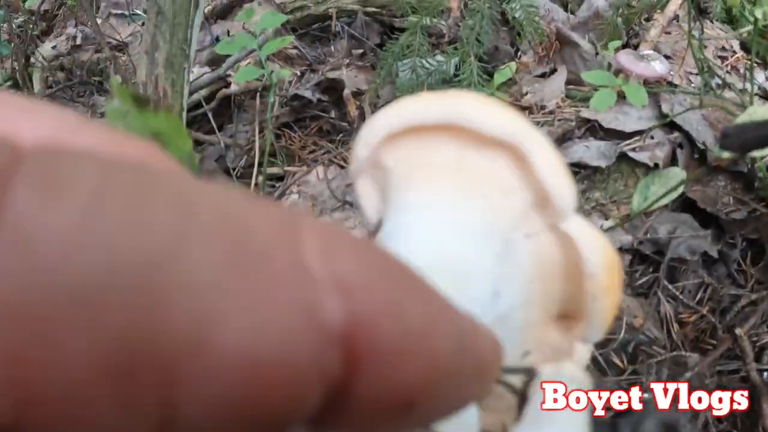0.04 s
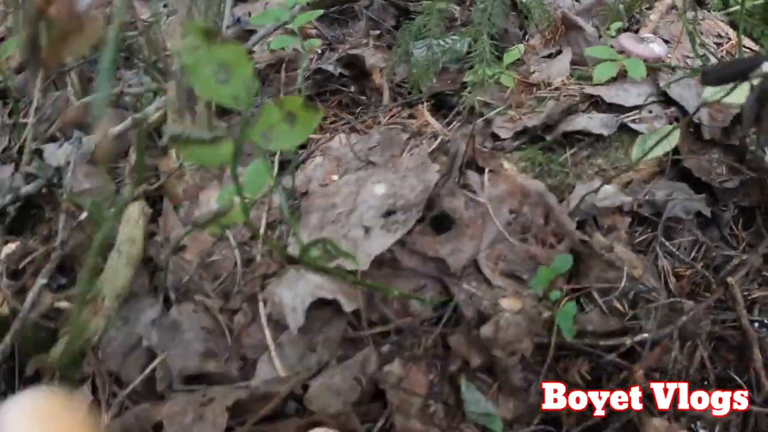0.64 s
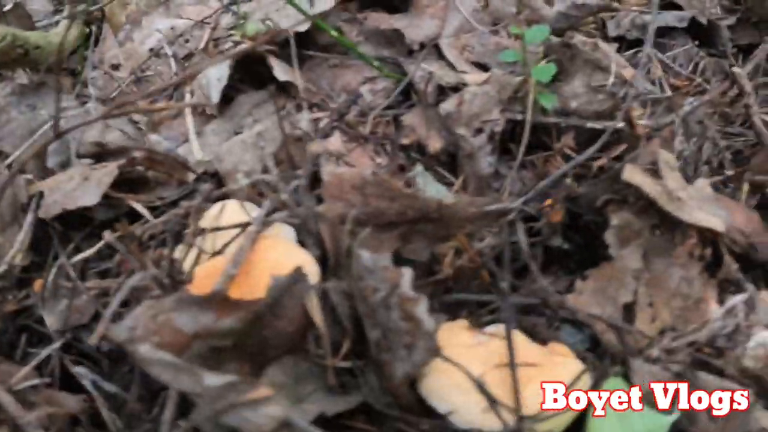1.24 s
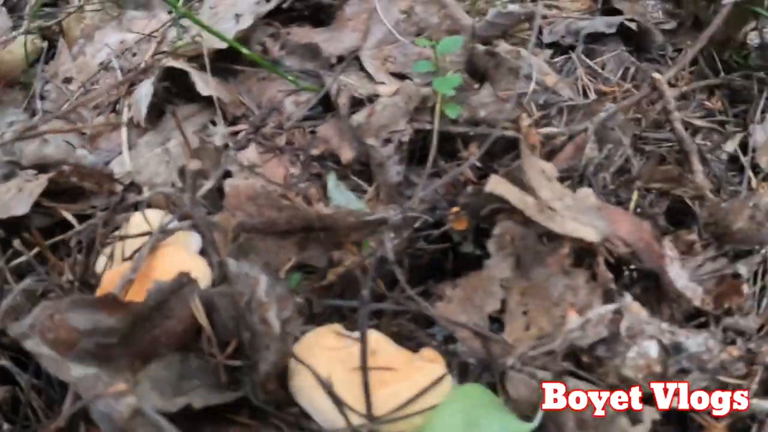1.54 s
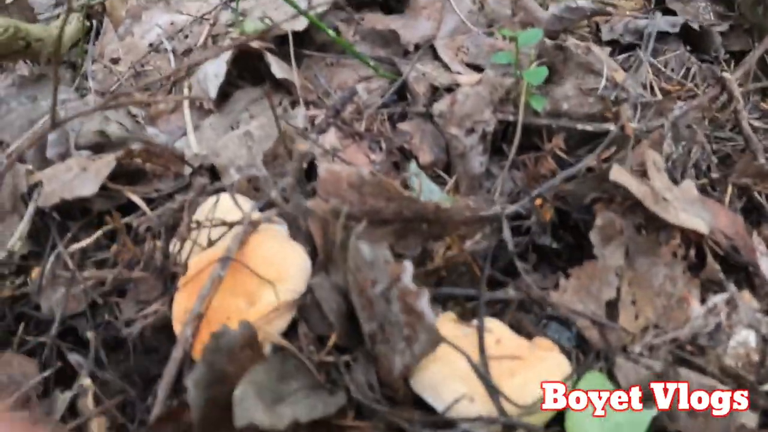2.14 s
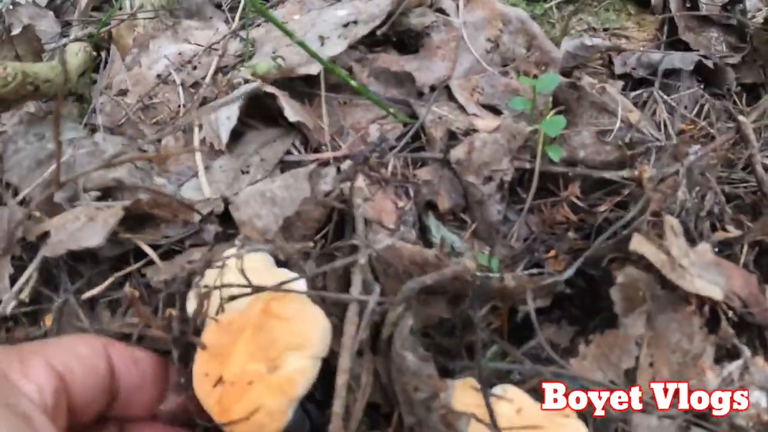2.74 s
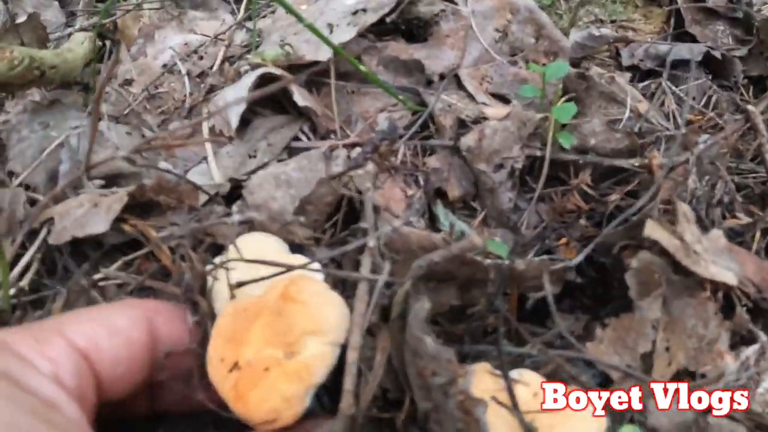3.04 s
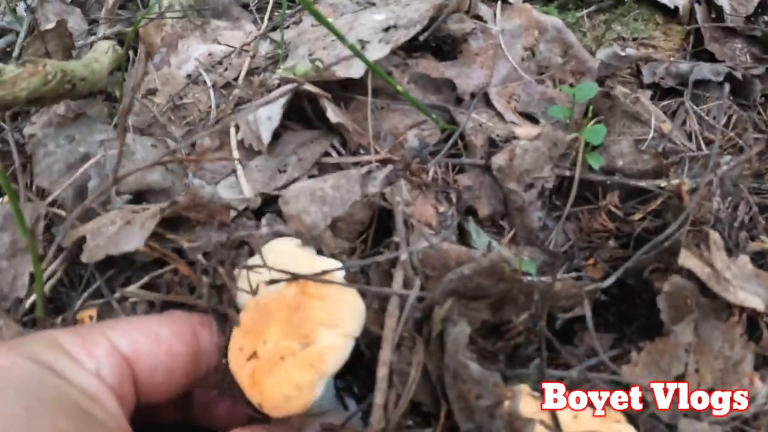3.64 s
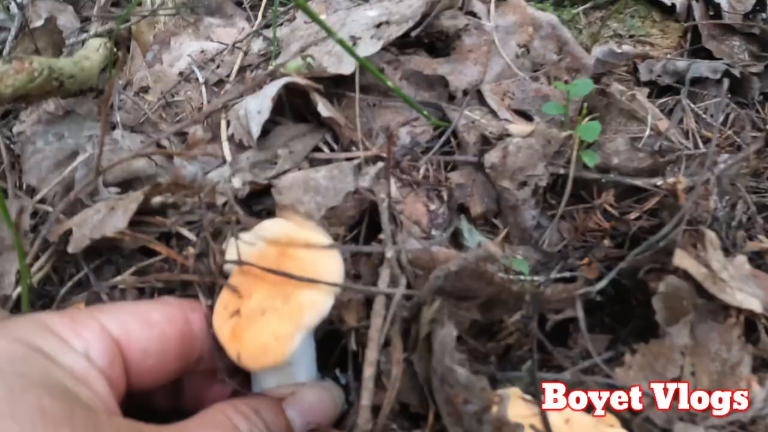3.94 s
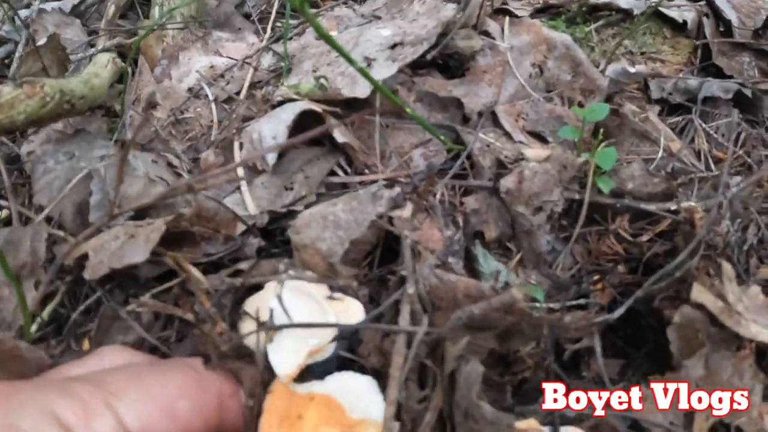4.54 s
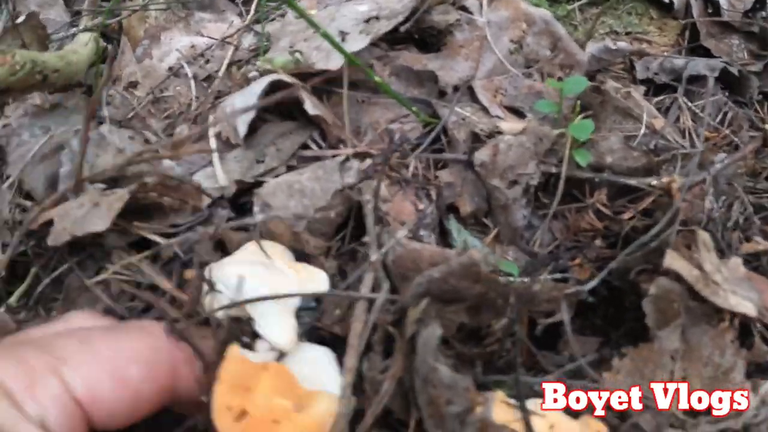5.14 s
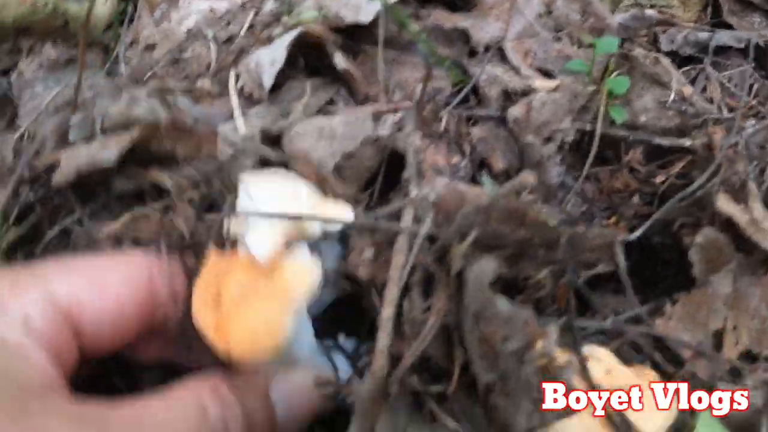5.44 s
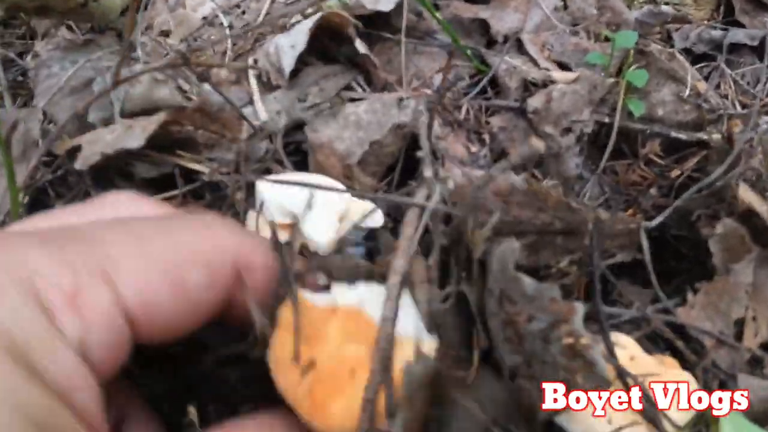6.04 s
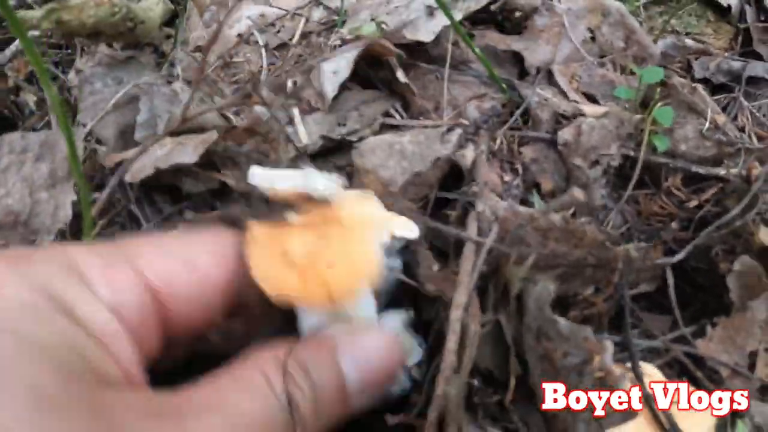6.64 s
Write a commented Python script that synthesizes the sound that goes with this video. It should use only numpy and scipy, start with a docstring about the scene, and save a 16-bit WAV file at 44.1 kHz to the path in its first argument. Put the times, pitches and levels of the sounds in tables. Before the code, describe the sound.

In a quiet forest, crumbs tick faintly between fingertips close to a hand-held microphone. A hand then pushes into dry leaf litter, rustling and scraping, and a wet stalk gives a tiny squeak. The digging grows louder with soft thuds, snapping twigs and hollow pops of parting stems, then eases. Near the end a muffled pop comes with the hardest knock, and the leaves rustle on.

```python
"""A hand digs a mushroom out of dry leaf litter, close to a hand-held camera in a quiet forest.
At first crumbs tick between the fingertips over the forest's hiss and the rumble of the moving camera.
Then the hand pushes in: leaves rub, scrape and fracture, soft impacts thud, and a wet stalk squeaks.
The digging grows louder, twigs and leaf veins snap, and parting stems ring a hollow in the soil.
Near the end a muffled pop comes with the hardest knock, and the leaves rustle on."""
import sys
import numpy as np
from scipy import signal
from scipy.fft import rfft, irfft, next_fast_len
from scipy.io import wavfile
from scipy.ndimage import map_coordinates

SR = 44100
rng = np.random.default_rng(int(sys.argv[2]) if len(sys.argv) > 2 else 0)


def master_out(mix):
    """Clip the mix to full scale and print it as 16-bit PCM to the path in sys.argv[1]."""
    frames = np.transpose(np.atleast_2d(mix))
    ceiling = np.clip(frames, -1, 1)
    pcm = np.round(ceiling * 32767).astype(np.int16)
    wavfile.write(sys.argv[1], SR, pcm)


N = 299439


def amp(db):
    """Decibels to amplitude gain."""
    return 10 ** (np.asarray(db) / 20)


def unit(x):
    """Scale to rms 1."""
    return x / np.sqrt(np.mean(x ** 2) + 1e-20)


def curves(rows):
    """Linear interpolation: one value per sample for each column after the time."""
    times, *columns = np.transpose(rows)
    return [np.interp(np.arange(N) / SR, times, column) for column in columns]


def wobble(rate):
    """Random modulation: a smooth curve through rate Gaussian knots a second."""
    knots = rng.standard_normal(int(N * rate / SR) + 4)
    return map_coordinates(knots, [np.arange(N) * rate / SR])


def filtered(x, response):
    """Linear filtering: the spectrum of x times a frequency response."""
    n = x.shape[-1]
    padded = next_fast_len(n + 2048)
    return irfft(rfft(x, padded) * response(np.fft.rfftfreq(padded, 1 / SR)), padded)[..., :n]


def coloured(x, points):
    """Spectral shaping by (Hz, dB) points on a logarithmic frequency axis."""
    point_hz, db = np.transpose(points)
    return filtered(x, lambda hz: amp(np.interp(np.log(hz + 1), np.log(point_hz), db)))


def ring(x, hz, q):
    """Forced response of one damped resonator."""
    return signal.lfilter(*signal.iirpeak(min(hz, .45 * SR), max(q, 1), SR), x)


def panned(lean_db):
    """Constant-power panning: left and right gains; the lean is left minus right in dB."""
    gains = amp(np.array([lean_db, -lean_db]) / 2)
    return gains / np.sqrt(np.mean(gains ** 2, axis=0))


def add(track, start, sound, lean_db):
    """Superposition: mix a sound into a stereo track from start seconds on."""
    part = track[:, round(start * SR):][:, :sound.shape[-1]]
    part += (panned(lean_db)[:, None] * sound)[:, :part.shape[1]]


def burst(x, db):
    """Give a transient the energy of 4 ms of steady sound at that level."""
    energy = np.mean(np.sum(x ** 2, axis=-1))
    return x * amp(db) * np.sqrt(.004 * SR / energy)


def stereo_noise(side_gain):
    """Partly coherent white noise: a common middle plus and minus an independent side."""
    mid, side = rng.standard_normal((2, N))
    return unit(np.array([mid + side_gain * side, mid - side_gain * side]))


def crackle(rate, spread_db, q, scatter_db, modes=14, breaks=1):
    """Impulse excitation: rate fractures a second, each a cluster of breaks, ring leaf fragments."""
    out = np.zeros((2, N))
    count = int(rate * N / SR / modes)
    for hz in np.geomspace(700, 16000, modes):
        onsets = rng.integers(0, N, (count, 1))
        at = (onsets + rng.integers(0, 70, (count, breaks))).ravel() % N
        strength = amp(spread_db * np.minimum(rng.exponential(size=(count, 1)), 3))
        signs = rng.choice([-1, 1], (count, breaks))
        sides = panned(scatter_db * rng.standard_normal((count, 1)))
        impulses = np.array([np.bincount(at, (strength * signs * side).ravel(), N) for side in sides])
        out += ring(impulses, hz, q)
    return unit(out)


def forest():
    """Ambient noise: a soft broadband hiss whose level drifts slowly."""
    # Each row: frequency in Hz, relative spectral level in dB.
    spectrum = [(20, -25), (100, 0.5), (180, 6), (320, -8), (550, -14.5), (820, -16), (1020, -6.5),
                (1380, -2), (4100, -12.5), (6770, -11.5), (8220, -20), (11800, -29), (13500, -31),
                (15600, -52)]
    hiss = unit(coloured(stereo_noise(side_gain=0.65), spectrum))
    return amp(-51.5 + 0.74 * wobble(1.28)) * hiss


def camera_rumble():
    """Handling noise: the camera rumbles as it swings down, steadies, then shifts again."""
    # Each row: time in seconds, relative rumble level in dB.
    sway = [(0.0, -46), (0.2, -50.5), (0.62, -52), (0.84, -41.5), (1.02, -43), (1.5, -47), (2.15, -43),
            (3.1, -48.5), (4.0, -53), (5.7, -49.5), (6.03, -54), (6.22, -42.5), (6.55, -52)]
    # Each row: frequency in Hz, relative spectral level in dB.
    spectrum = [(2, 6), (8, 8), (15, 8), (32, 5), (55, 1), (78, -4.5), (110, -25), (300, -57), (800, -120)]
    envelope = amp(curves(sway)[0] + 5 + 3.3 * wobble(8.5))
    rumble = unit(coloured(stereo_noise(side_gain=0.15), spectrum))
    return envelope * rumble * panned(-2.9)[:, None]


def fingertips():
    """Sparse impulses: before the digging, crumbs of litter tick as the fingers turn a mushroom."""
    crumbs = crackle(rate=41, spread_db=0, q=1.3, scatter_db=2, modes=4, breaks=5)
    ticks = coloured(crumbs, [(1000, 3), (4000, 5), (7000, 5), (12500, -7), (15000, -29)])
    level_db, = curves([(0, -55.5), (0.3, -75), (0.6, -54), (0.8, -90)])
    return amp(level_db) * unit(ticks)


def knocks():
    """Damped oscillation: each soft impact of the hand on the ground gives a few low cycles."""
    # Each row: start in seconds, level in dB at which the decay begins, pitch in Hz, t60 in seconds.
    bumps = [(0.873, -28, 166, 0.042), (1.307, -28, 55, 0.098), (2.112, -20, 135, 0.049),
             (2.149, -18, 55, 0.082), (2.183, -13, 73.4, 0.12), (2.194, -20.5, 167, 0.1),
             (2.351, -18.5, 40, 0.12), (2.435, -21.5, 122, 0.08), (4.157, -27, 60, 0.11),
             (5.13, -37, 55, 0.098), (5.645, -37, 50, .14), (6.0111, -9, 210, 0.042),
             (6.011, -14, 362, 0.044), (6.769, -14, 160, 0.026), (6.77, -26, 337, 0.045)]
    out, t = np.zeros((2, N)), np.arange(SR // 4) / SR
    attack = 1 - np.exp(-t / 0.0013)
    for start, db, hz, t60 in bumps:
        thud = attack * amp(db - 60 * t / t60) * np.sin(2 * np.pi * hz * t)
        add(out, start, thud, lean_db=-1.5)
    return out


def scrapes():
    """Friction drives a resonance: a leaf edge drags over a twig in slips that swell and fade."""
    # Each row: centre in seconds, level there in dB, resonance in Hz, 1/e half-width in seconds.
    drags = [(0.054, -44, 1190, 0.0043), (0.731, -28.5, 1290, 0.0015), (0.794, -38, 1020, 0.012),
             (0.796, -42, 1690, 0.01), (0.944, -35.5, 2700, 0.0082), (1.012, -37, 2120, 0.014),
             (1.111, -32, 2900, 0.0034), (1.217, -33, 5850, 0.0061), (3.379, -28, 6300, .006),
             (5.808, -32, 1360, 0.0024)]
    out, half_window_s = np.zeros((2, N)), .03
    t = np.arange(-half_window_s, half_window_s, 1 / SR)
    for centre, db, hz, width in drags:
        slips = unit(ring(rng.standard_normal(len(t)), hz, q=6.6))
        swell = np.exp(-(t / width) ** 2)
        add(out, centre - half_window_s, amp(db) * slips * swell, lean_db=5)
    return out


def squeak():
    """Friction tones: a wet stalk slips by the left microphone with a rasp, then two rising whistles."""
    # Each row: time in seconds, pitch of the upper whistle in Hz, its mean level in dB.
    glide = [(1.131, 3900, -44), (1.138, 4900, -28), (1.145, 6000, -28), (1.149, 7100, -16),
             (1.153, 7700, -35)]
    out, t = np.zeros((2, N)), np.arange(N) / SR
    age = t[:400]
    rasp = coloured(rng.standard_normal(len(age)),
                    [(1500, -34), (3800, -2), (5500, -2), (7600, 9.0), (9000, -18), (15000, -32)])
    slip = np.sin(2 * np.pi * 6900 * age) + .5 * unit(rasp)
    swell = np.exp(-((age - .003) / 0.0016) ** 2)
    add(out, 1.1235, burst(slip * swell, db=-10.5), lean_db=19)
    hz, db = curves(glide)
    phase = 2 * np.pi * np.cumsum(hz * (1 + 0.063 * wobble(1500))) / SR
    whistles = np.sin(phase) + 0.53 * np.sin(.63 * phase)
    sliding = (t > glide[0][0]) & (t < glide[-1][0])
    add(out, 0, sliding * amp(db + 2 * wobble(500)) * whistles, lean_db=28)
    return out


def soil_hollow(hz):
    """Modal superposition: the response of a hollow in the soil, its modes alternating in sign."""
    # Each row: mode frequency in Hz, bandwidth in Hz, gain in dB.
    modes = [(224, 180, 3), (527, 240, 3.5), (945, 280, 3.5), (1420, 400, 4), (2600, 430, 2),
             (3980, 380, -2), (5700, 1000, -4.5), (7300, 440, 3)]
    return sum((-1) ** k * amp(db) * 1j * hz * width / (centre ** 2 - hz ** 2 + 1j * hz * width)
               for k, (centre, width, db) in enumerate(modes))


def pops():
    """Cavity resonance: a moist stem or root parts in two steps and rings the hollow around it."""
    # Each row: start in seconds, level in dB, ring in Hz, cutoff in Hz, t60 of the tearing in seconds.
    partings = [(1.2994, -29.5, 1090, 1490, 0.022), (1.7064, -20.5, 2920, 3600, 0.016),
                (2.146, -17.5, 1070, 2000, 0.0049), (4.7221, -19.5, 1030, 11000, 0.01),
                (5.0350, -11, 1390, 8950, .001), (6.0082, -18.5, 990, 1300, 0.028)]
    out, t = np.zeros((2, N)), np.arange(1536) / SR
    steps = np.sinc(t * SR) + 0.089 * np.sinc((t - .00076) * SR)
    for start, db, hz, cutoff_hz, t60 in partings:
        fibres = rng.standard_normal(len(t)) + 0.66 * rng.standard_normal((2, len(t)))
        tear = steps + 0.091 * amp(-60 * t / t60) * fibres
        muffling = signal.butter(2, cutoff_hz, fs=SR)  # deep pops are duller
        body = signal.lfilter(*muffling, filtered(tear, soil_hollow))
        pop = ring(body, hz, q=2.2) + .9 * body
        add(out, start, burst(pop, db), lean_db=1)
    return out


def snaps(later_breaks=4):
    """Brittle fracture: fibres of a twig or leaf vein break within 2 ms and ring the fragment."""
    # Each row: time in seconds, relative level in dB, ring in Hz, left minus right in dB.
    fractures = [(0.4997, -37.5, 7000, 10), (0.627, -34.5, 4160, 1), (0.7503, -32.5, 4300, -14),
                 (1.211, -15, 6600, 23), (1.3874, -30.5, 7500, 15), (1.592, -28, 7140, 25),
                 (1.6703, -30, 3800, 0), (1.7327, -21.5, 6740, 1), (1.7854, -24.5, 2740, -3),
                 (2.183, -21, 4330, -1), (2.343, -16, 6800, 6), (2.428, -17.5, 5700, 0),
                 (2.71, -21.5, 6000, -7), (2.888, -16, 6100, -2), (2.975, -17.5, 7100, 7),
                 (3.0426, -22, 2500, 3), (3.0722, -25, 6100, 5), (3.1668, -25.5, 6100, 4),
                 (3.1888, -28, 3580, 2), (3.2846, -28, 6300, 3), (3.3838, -26, 6400, 17),
                 (3.4482, -34.5, 2420, 1), (3.5172, -29, 6860, 7), (3.693, -27.5, 4440, 4),
                 (3.707, -26, 6600, 3), (3.8622, -31.5, 7000, -1), (3.873, -31.5, 2500, 1),
                 (3.9852, -26.5, 10500, 1), (4.0663, -18, 10900, 2), (4.077, -37, 9000, -1),
                 (4.1004, -16, 5400, 0), (4.2233, -30, 6400, 5), (4.2867, -29.5, 6200, 6),
                 (4.3458, -27.5, 6600, 7), (4.372, -24, 6700, 2), (4.42, -21.5, 3100, 2),
                 (4.4238, -22, 6000, 3), (4.435, -23.5, 6400, 6), (4.5388, -21.5, 6160, 9),
                 (4.5683, -27.5, 6440, 2), (4.6994, -26.5, 6800, 2), (4.8079, -29, 3080, 4),
                 (4.896, -18, 6400, 8), (5.007, -33, 7300, 10), (5.1753, -23.5, 6750, 7),
                 (5.5407, -28, 6700, 8), (5.6637, -25.5, 6600, 2), (5.7793, -26.5, 6900, 2),
                 (5.8332, -28, 5200, 4), (6.2779, -21.5, 7740, 7), (6.341, -26, 4800, 3),
                 (6.489, -25.5, 1760, 5), (6.539, -24.5, 5200, 8), (6.5922, -26, 1310, 0),
                 (6.687, -26, 5730, 4)]
    # Each row: frequency in Hz, relative spectral level of the breaking force in dB.
    spectrum = [(100, -14), (700, -18.5), (1100, -1.5), (4000, 0.5), (7000, 3.5), (8500, -4), (12000, -10),
                (15500, -29)]
    out, t = np.zeros((2, N)), np.arange(1280) / SR
    lead_s = .002
    age = np.maximum(t - lead_s, 10 * (lead_s - t))  # splinters come on faster than they fade
    splinter_envelope = 0.059 * amp(-60 * age / 0.00093) + 0.045 * amp(-60 * age / 0.041)
    for time, db, hz, lean_db in fractures:
        delays = np.append(0, rng.uniform(.0001, .0015, later_breaks))
        sizes = np.append(1, rng.uniform(.4, .85, later_breaks) * rng.choice([-1, 1], later_breaks))
        breaks = np.bincount((SR * (lead_s + delays)).astype(int), sizes, len(t))
        splinters = splinter_envelope * rng.standard_normal((2, len(t)))
        force = coloured(breaks + splinters, spectrum)
        snap = unit(ring(force, hz, q=7.7)) + 1.36 * unit(force)
        add(out, time - lead_s, burst(snap, db - .8), lean_db)
    return out


def pushes():
    """Incoherent addition: pushes build, settle and sum in power; returns level and mean depth in dB."""
    # Each row: start in seconds, length in seconds, full level in dB, build-up in dB,
    # depth as a gain of the soil's sound in dB.
    strokes = [(0.582, 0.15, -39, 16, -7.5), (0.745, 0.49, -38.5, -2.5, -1), (1.247, 0.043, -34, 8, 6.5),
               (1.327, 0.025, -41, 3, 9), (1.38, 0.073, -48.5, 6, 2), (1.457, 0.037, -42, 0, -5.5),
               (1.502, 0.11, -44.5, -4, 3.5), (1.628, 0.063, -46, -2, 5), (1.694, 0.062, -35, 5, 6.5),
               (1.773, 0.019, -30.5, 11, 5.5), (1.867, 0.31, -18, 19.5, 0), (2.229, 0.194, -31, -3.5, 3.5),
               (2.331, 0.028, -28.5, 0, 3.5), (2.418, 0.031, -23, -2.5, 4.5),
               (2.467, 0.12, -27.5, -0.5, -3.5), (2.588, 0.04, -25.5, 1, -4), (2.644, 0.12, -27, -1, 1.5),
               (2.793, 0.12, -27.5, 1, 0), (2.926, 0.11, -27, 11, 2.5), (3.068, .11, -39.5, 1, 1.5),
               (3.203, 0.11, -44, 0.5, -0.5), (3.308, 0.072, -37, 9, 1.5), (3.419, 0.14, -41.5, -5, 0.5),
               (3.578, 0.066, -40, -1, -0.5), (3.676, 0.17, -41, 7, 2.5), (3.88, 0.18, -46.5, 3.5, 0),
               (4.073, 0.075, -38.5, 10, 6.5), (4.258, 0.046, -40.5, 10, -5), (4.354, 0.11, -34, 6, -1),
               (4.464, 0.11, -34.5, 4, 0), (4.646, 0.15, -42, -2, -4), (4.831, 0.074, -31, 13, -1.5),
               (4.931, 0.014, -30.5, 9, -2), (4.975, .04, -53, 0, 10), (5.108, 0.24, -40.5, 0, 1),
               (5.368, 0.13, -38, 15.5, -0.5), (5.523, 0.11, -37, 4.5, 5), (5.704, .07, -45.5, -1, -4),
               (5.783, 0.23, -34.5, 6.5, 2.5), (5.989, .105, -30.5, 3, 6.5), (6.117, 0.34, -33.5, 1.5, 4.5),
               (6.479, 0.082, -35.5, -3.5, 0), (6.585, .2, -33, 6, 0.5)]
    attack_s, settle_t60_s = 0.0083, 0.22  # leaves yield at once and settle after the push
    t = np.arange(N) / SR
    power = np.full(N, amp(-55) ** 2)  # the hand resting among the leaves
    weighted_depth = np.zeros(N)
    for start, length, db, build_db, depth_db in strokes:
        attack = np.clip((t - start) / attack_s, 0, 1)
        to_go = np.clip(1 - (t - start) / length, 0, 1)
        settled = np.clip((t - start - length) / settle_t60_s, 0, 2)
        push_power = (attack * amp(db - build_db * to_go ** 2 - 60 * settled)) ** 2
        power += push_power
        weighted_depth += depth_db * push_power
    return 10 * np.log10(power), weighted_depth / power


def litter():
    """Friction and fracture: leaves crackle and rub and soil scrapes, all modulated by the same jerks."""
    # Each row: time in seconds, left minus right in dB, relative level of the brittle crackle in dB.
    movement = [(0.6, 3.5, -18), (1.1, 5.5, -10), (1.6, 7, -4.5), (2.1, 1.5, -9), (2.5, 3, -5.5),
                (3.1, 2.5, -2.5), (4, 2.5, 0.5), (4.9, 3.5, -8), (5.4, 4.5, -3), (6, 2, -6),
                (6.8, 1.5, -3.5)]
    # Each row: frequency in Hz, relative spectral level of the leaves in dB.
    leaf_spectrum = [(59, -41), (100, -5), (320, -14.5), (355, -6), (590, -10.5), (845, -9.5), (959, -3.5),
                     (1320, -4), (1460, -4.5), (2190, -5), (6700, -3), (10700, -10.5), (12100, -12),
                     (14000, -21), (15600, -57)]
    # The left microphone port rings a little near 7 kHz. Each row: frequency in Hz, gain in dB.
    left_port = [(500, -0.5), (1200, -2), (2500, -0.5), (5000, -0.5), (6900, 4), (8500, -3), (15000, -4)]
    crisp_db, depth_db = pushes()  # harder pushes are brighter, deeper ones duller
    force_db = crisp_db + 35  # relative to a middling push
    rub_db = -39 + 0.91 * force_db + 0.22 * depth_db
    soil_db = -46.5 + 0.93 * force_db + depth_db
    lean_db, brittle_db = curves(movement)
    jerks = amp(1.22 * wobble(40) + 1.9 * wobble(260))
    fine = crackle(rate=9000, spread_db=3.5, q=3.7, scatter_db=1.0)
    brittle = crackle(rate=260, spread_db=3.5, q=2.4, scatter_db=2, modes=7, breaks=4)
    curled = crackle(rate=330, spread_db=3, q=22.0, scatter_db=6.0, modes=23)  # stiff leaves ring longer
    slide = fine + amp(-4.5) * curled + amp(-1) * stereo_noise(side_gain=0.4)
    stir = coloured(jerks * (slide + amp(brittle_db + 2) * brittle), leaf_spectrum)
    stir[0] = coloured(stir[0], left_port)
    rub = filtered(stir, lambda hz: 1 / (1 + (hz / 3200) ** 6))
    leaves = panned(lean_db) * (amp(crisp_db) * unit(stir - rub) + amp(rub_db) * unit(rub))
    grit = coloured(jerks * stereo_noise(side_gain=0.25),
                    [(50, -11), (110, -0.5), (200, -1.0), (400, -7), (750, -11), (1300, -45)])
    soil = amp(soil_db) * unit(grit) * panned(-1.9)[:, None]
    reach = np.clip((np.arange(N) / SR - .53) / 0.15, 0, 1)  # the hand comes down to the ground
    return reach * (leaves + soil)


def scene():
    """Free-field superposition: the sources add in the open, with no echo."""
    digging = litter() + snaps() + pops() + scrapes() + squeak() + knocks()
    return digging + fingertips() + forest() + camera_rumble()


def record(dry):
    """Phase shift and band limiting: two microphone ports are out of step; the camera clips and cuts."""
    # Each row: frequency in Hz, phase by which the left port leads in radians.
    port_phase = [(0, 0.089), (520, -0.33), (3190, -0.75), (5600, -0.63), (6980, -1.33), (8350, -0.68),
                  (12200, 0.76), (15300, 1)]
    band_limit_hz = 15762
    point_hz, radians = np.transpose(port_phase)
    half_each_way = np.array([[.5j], [-.5j]])
    ports = filtered(dry, lambda hz: np.exp(half_each_way * np.interp(hz, point_hz, radians)))
    return filtered(np.clip(ports, -1, 1), lambda hz: hz < band_limit_hz)


dry = scene()
out = record(dry)
master_out(out)
```